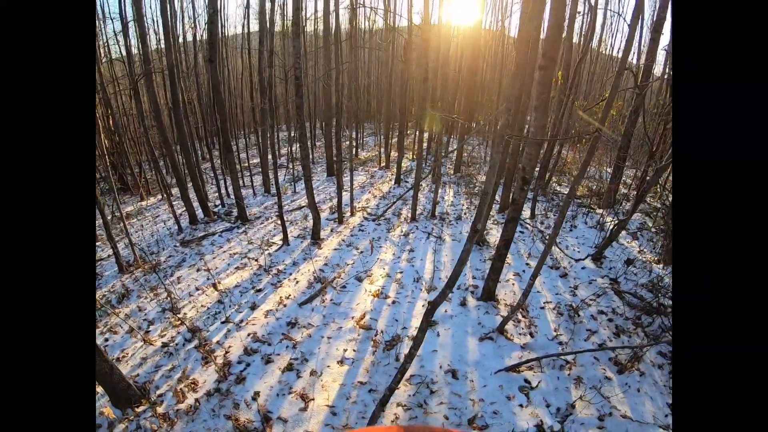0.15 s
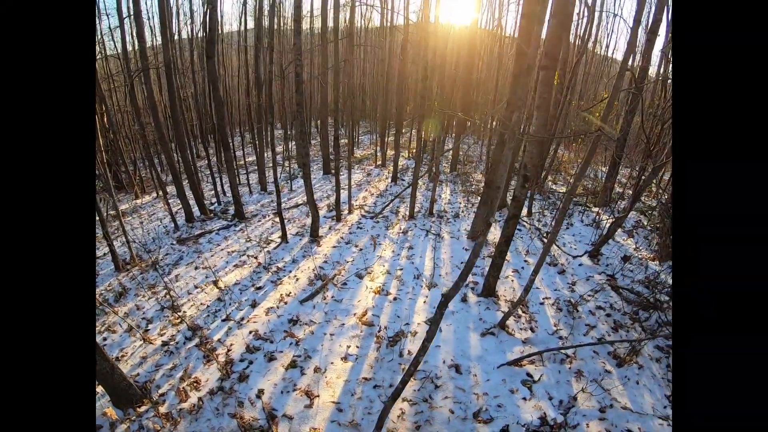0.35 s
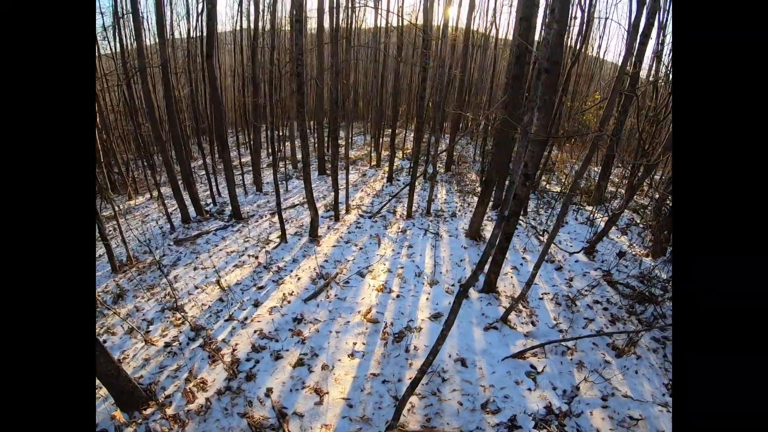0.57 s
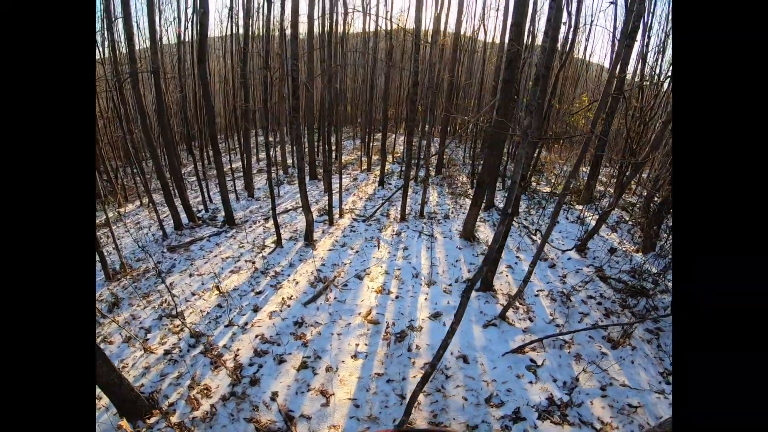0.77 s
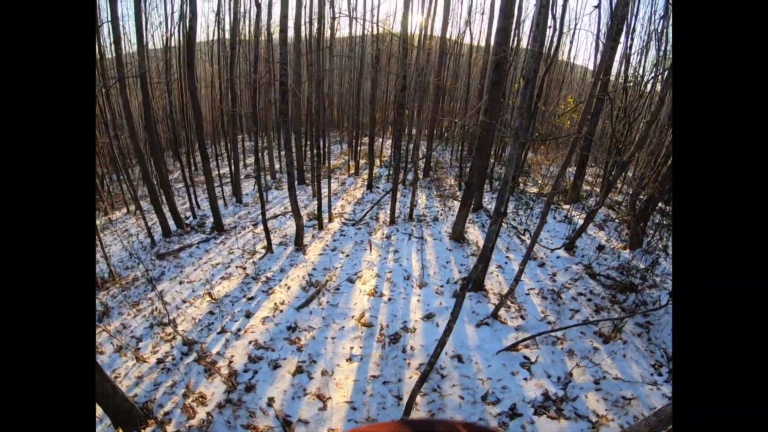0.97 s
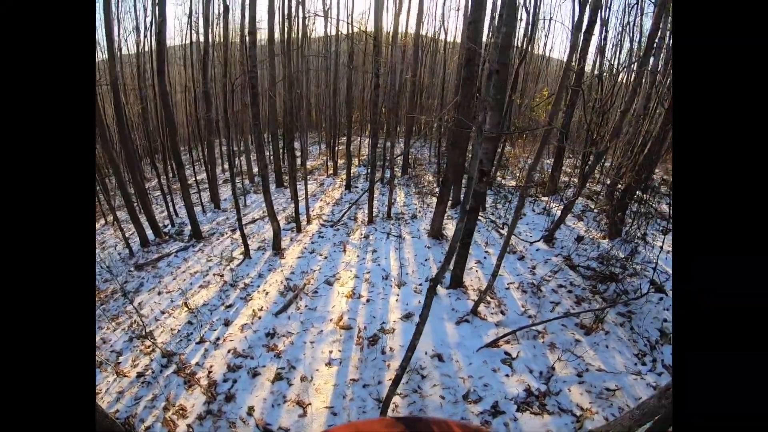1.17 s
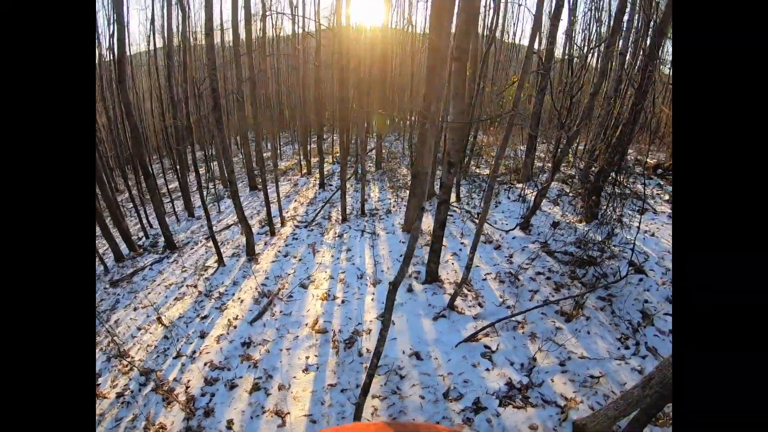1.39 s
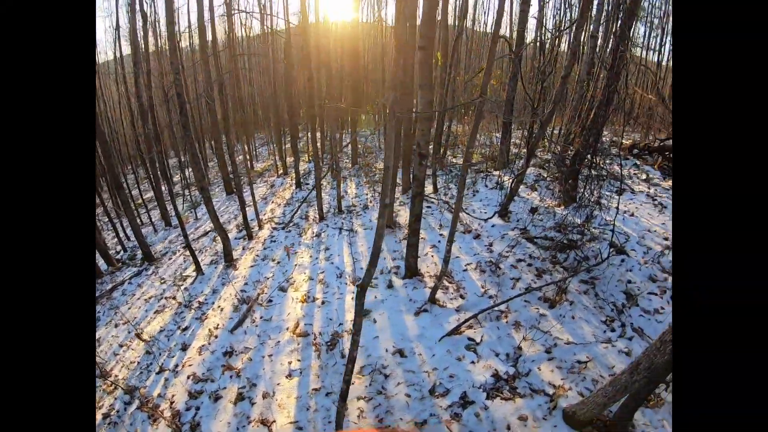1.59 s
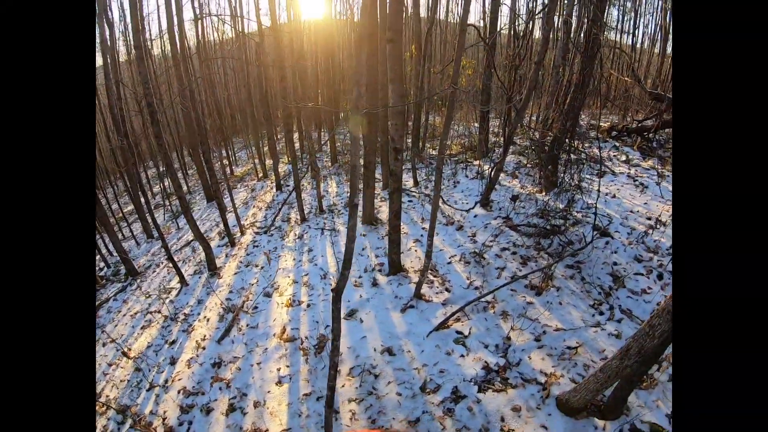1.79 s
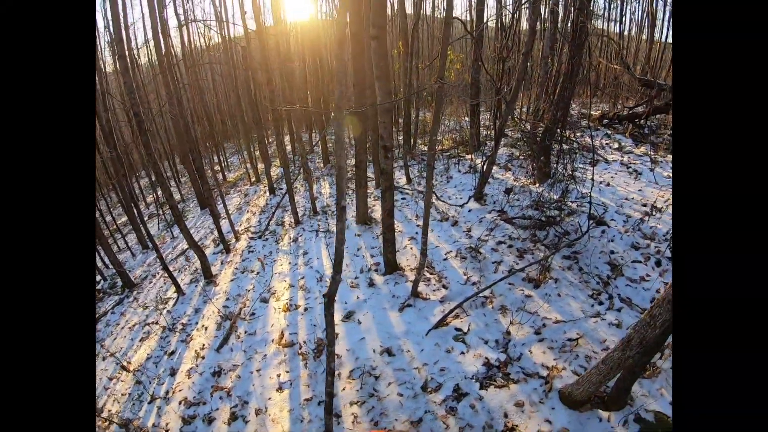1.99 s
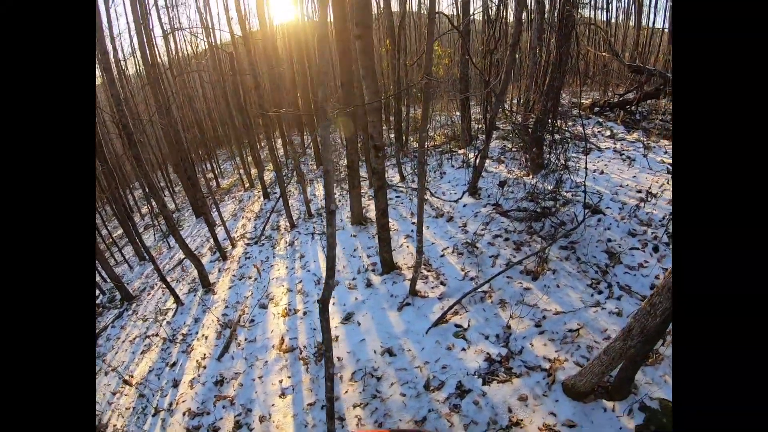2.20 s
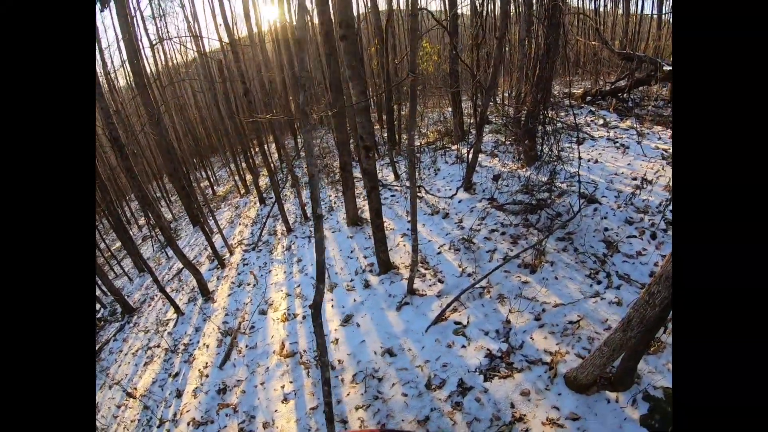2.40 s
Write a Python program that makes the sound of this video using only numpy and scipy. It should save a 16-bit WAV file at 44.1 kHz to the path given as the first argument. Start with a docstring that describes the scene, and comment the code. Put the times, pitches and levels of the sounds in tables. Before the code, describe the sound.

Boots press crisply into crusted snow over dead leaves, twigs snapping, then settle in a quiet wood

```python
"""Footsteps on snow and dry leaves

Two slow steps press through thin snow onto dry leaves in a still wood, then the walker shuffles to a halt.
Snow, leaves, ice and cloth are trains of random grains; crust and twigs are single breaks with splinters.
Decaying noise echoes scatter the steps; a faint low drone and a little wind are coloured noise."""
import sys
import numpy as np
from scipy import signal
from scipy.fft import rfft, irfft
from scipy.io import wavfile

SR = 44100
rng = np.random.default_rng(int(sys.argv[2]) if len(sys.argv) > 2 else 0)


def master(y):
    """Save y as 16-bit WAV."""
    cut = np.clip(np.atleast_2d(y).T, -1, 1)
    pcm = np.round(cut * 32767)  # scale
    wavfile.write(sys.argv[1], SR, pcm.astype(np.int16))


N = 108045
HZ = np.fft.rfftfreq(2048, 1 / SR)  # frequency grid for click spectra

# Foot pressure in the two steps, then the shuffle: time_s, snow_db (before SNOW_TRIM_DB), leaf_db, fizz_db
STEP_LEVELS = [(0, -85, -64, -71), (.08, -78, -62.5, -79), (.185, -87, -70, -80), (.24, -59, -48, -55.5),
               (.26, -44.5, -43.5, -54.5), (.28, -45, -48.5, -50), (.33, -47, -44, -48),
               (.40, -42.5, -38.5, -45), (.54, -40, -38.5, -43), (.63, -38.5, -39.5, -44.5),
               (.68, -42.5, -39.5, -48), (.755, -39, -41, -45.5), (.79, -40, -38, -47),
               (.815, -49, -44, -50), (.89, -48, -45.5, -54.5), (.925, -42, -47.5, -56.5),
               (.945, -40, -43.5, -42), (.985, -35.5, -38.5, -43.5), (1.05, -42, -39.5, -46),
               (1.13, -37.5, -38.5, -45.5), (1.205, -42, -38, -47.5), (1.23, -44.5, -45, -52),
               (1.30, -58, -53.5, -59.5), (1.375, -54.5, -56, -68), (1.44, -66, -64, -65)]
SHUFFLE_LEVELS = [(1.52, -68, -65, -70), (1.55, -57, -56.5, -60.5), (1.621, -65.5, -69, -71),
                  (1.72, -71, -72.5, -76), (1.78, -67, -67, -71), (1.83, -58.5, -57.5, -64),
                  (1.898, -53.5, -54.5, -55.5), (1.96, -64, -56.5, -68), (2.009, -74, -55.5, -55),
                  (2.05, -62, -60.5, -62.5), (2.12, -63, -53.5, -56.5), (2.169, -56, -53.5, -52.5),
                  (2.24, -83.5, -65, -75), (2.322, -68, -68.5, -72), (2.36, -71, -79, -63.5),
                  (2.45, -70.5, -89, -96)]
# Relative spectra of snow, leaf and ice grains: freq_hz, density_db_per_hz
SNOW_SPECTRUM = [(60, -57), (110, -31), (160, -17), (250, 0), (450, 2.5), (800, 0.5), (1200, -3),
                 (1800, -7), (4000, -33.5)]
LEAF_SPECTRUM = [(150, -59.5), (600, -7.5), (1200, -3), (1800, -5), (2500, -1.5), (3300, -3.5), (4300, -8),
                 (6000, -17), (12000, -44.5)]
FIZZ_SPECTRUM = [(1000, -34), (3500, -6.5), (5200, -2.5), (6500, -1), (8000, -1.5), (9500, -9.5),
                 (11000, -15), (13000, -24), (15000, -28)]
SNOW_TRIM_DB = -1.5
# Grain rate: nominal at BUSY_DB, doubling every RATE_DOUBLING_DB
BUSY_DB, RATE_DOUBLING_DB, GRAIN_RIPPLE_DB = -39.5, 7.5, 2

# Clothing rustle, relative spectrum: freq_hz, density_db_per_hz
CLOTH_SPECTRUM = [(250, -32), (450, -2), (800, -2), (1300, -1.5), (2000, -9.5), (4000, -21), (10000, -36.5)]
# Clothing rustle, level: time_s, level_db
CLOTH_LEVEL_DB = [(0, -67.5), (.08, -60), (.13, -61), (.22, -56.5), (.4, -62), (1.3, -61.5), (1.45, -67),
                  (1.7, -72), (2.45, -81)]

# Faint far drone, relative spectrum: freq_hz, density_db_per_hz
DRONE_SPECTRUM = [(30, -28), (90, -17.5), (120, -7), (145, -2), (195, 0.5), (230, 0), (270, -28),
                  (600, -19.5), (2000, -33), (8000, -34.5), (15000, -74)]
# Drone level: time_s, level_db
DRONE_LEVEL_DB = [(0, -62), (1.2, -60), (1.7, -62), (2, -58), (2.45, -59.5)]
# Light wind, relative spectrum: freq_hz, density_db_per_hz
WIND_SPECTRUM = [(10, 0), (35, 9.5), (55, 5), (90, -4.5), (130, -10), (300, -63)]
# Wind level before the side gain: time_s, level_db
WIND_LEVEL_DB = [(0, -71), (.6, -64.5), (.83, -87), (1.05, -66), (1.6, -65), (2.3, -71), (2.4, -78.5)]
# Soft low bumps of air, before the side gain: centre_s, level_db
AIR_PUFFS = [(.19, -72), (.47, -60), (.58, -79), (1.17, -65), (1.33, -58), (1.44, -56), (1.509, -63),
             (1.76, -53), (1.95, -73), (2.1, -74), (2.31, -77)]
WIND_LEFT_GAIN_DB, PUFF_SIGMA_S = -1.5, 0.0088  # right channel gets the opposite gain

# Leaves and twigs snapping: start_s, level_db, bass_db, treble_db, twig_ring_db, splinter_decay_s
SNAP_EVENTS = [(.028, -47, 1, -13, 5, .001), (.083, -32.5, 2, -1, 0, 0.0055),
               (0.146, -29, 10, 9, -3, 0.011), (.199, -25.5, 2, 2, -6, 0.0037),
               (.255, -16, -7, 7, -13, .006), (0.518, -14, 3, -3, -5, 0.0033),
               (.647, -10, -1, 6, 5.5, 0.0024), (.839, -12.5, 0.5, -6, -7, 0.0016),
               (1.182, -15, 9, 5, -4, 0.0044), (1.195, -15.5, -6, -12, 3, .004),
               (1.303, -20.5, -9, 4, -1, 0.0026), (1.313, -26, -24, -11, 20, 0.0013),
               (1.351, -24, 4, -19, -1, .0008), (1.372, -28, 16, -3, -8, 0.0023),
               (1.495, -31, 9.5, 14, 2.5, 0.0015), (1.529, -18.5, 2, -3, -13, 0.01),
               (1.548, -20, 2, -19, -2, 0.0069), (1.749, -32.5, -29, -20, 4, .001),
               (1.768, -33.5, 1, 2, -4, 0.0018), (1.790, -25, 17, 17, 8, 0.01),
               (1.819, -23, -3, 8, 0, 0.0011), (1.8232, -22, 14.5, 6, -6, 0.00074),
               (1.874, -20, -8, 3, 2, .002), (1.888, -10.5, 5.5, 6.5, -1.5, 0.0049),
               (1.9823, -17.5, 10, 4, 1, 0.0061), (2, -19, -5, 12, -1, 0.0056),
               (2.005, -16.5, -4.5, 0, -1, 0.0054), (2.080, -12.5, 3, 24, 13, 0.00075),
               (2.1364, -5.5, -3.5, -3.5, -3.5, 0.0078), (2.182, -18.5, -6, -37, 2, 0.0008),
               (2.23, -29, -17, 1, -12, .001), (2.265, -30.5, 0, 0, -6, 0.0013),
               (2.337, -23, -12.5, 1, -13, 0.0071)]
# Snap base spectrum, relative: freq_hz, density_db_per_hz
SNAP_SPECTRUM = [(70, -53.5), (160, 0), (400, 2), (900, 7), (1400, 6), (2400, 3.5), (3300, 9.5),
                 (4400, -3.5), (6200, -3), (8500, -13), (11000, -22), (15000, -33)]
TWIG_HZ, TWIG_HALF_WIDTH_HZ = 3230, 610
# TEAR_DECAY_S: burst decay before whitening; SPLINTER_SIZE: relative to the first break
TEAR_DECAY_S, SPLINTERS_PER_S, SPLINTER_SIZE = 0.00026, 3200, 0.65

# Lumps of crust giving way: start_s, level_db, pitch_hz, crumble_decay_s
CRUST_EVENTS = [(0.2236, -25.5, 620, 0.0063), (0.2515, -10.5, 650, 0.00092), (.262, -27, 820, 0.0049),
                (.286, -11, 860, 0.018), (0.376, -11, 600, 0.009), (.478, -21.5, 420, .005),
                (.579, -17, 650, 0.0019), (.598, -9.5, 710, 0.01), (0.629, -20, 560, .002),
                (0.646, -8, 735, 0.0038), (.723, -18, 750, 0.00089), (0.744, -11.5, 740, 0.0028),
                (0.758, -11.5, 537, 0.0066), (.798, -16, 534, 0.0017), (.940, -10, 515, 0.0065),
                (.970, -12, 524, 0.007), (.989, -8, 426, 0.0025), (1.034, -11, 550, .004),
                (1.078, -10, 500, 0.0037), (1.082, -13.5, 400, .004), (1.133, -9.5, 625, 0.012),
                (1.212, -16.5, 840, 0.003), (1.379, -26.5, 1100, .001), (1.538, -24, 880, 0.0018),
                (1.604, -26.5, 930, 0.00091)]

# Full weight on the snow: start_s, length_s, level_db
PRESS_EVENTS = [(0.355, 0.3, -50.5), (0.734, 0.058, -54.5), (0.961, .21, -44.5)]
# Packing snow, relative spectrum: freq_hz, density_db_per_hz
PACKING_SPECTRUM = [(60, -53), (110, -21), (150, -3), (220, 0), (330, -1), (450, 3), (700, -13.5),
                    (2000, -50)]
PRESS_RISE_S, PRESS_DECAY_S = 0.0124, 0.048

# Microphone pair, direct sound: freq_hz, left_minus_right_db
PAIR_BALANCE = [(200, 0.5), (400, 2.6), (750, -2), (1300, -3), (2400, 0), (4400, 1.5), (8300, -4.5),
                (10200, 26.5), (12000, 18)]
# Microphone pair, direct sound: freq_hz, left_lead_rad
PAIR_LEAD = [(250, 0), (780, -.3), (1500, .2), (2300, 0), (4300, .1), (6000, -1.2), (8000, -2.6),
             (10000, 0)]
# Near scatter relative to direct: freq_hz, scatter_db
SCATTER_RATIO = [(100, -30), (200, -45), (350, -12), (800, -4), (1500, -2), (3400, -4), (5000, -2.5),
                 (7000, 1.5), (14000, 12)]
# Colour of the wood's echo, before WOOD_DB: freq_hz, gain_db
WOOD_GAIN = [(150, -14), (400, -18), (900, -2.5), (4000, -5), (12000, 5)]
# Side of the feet: time_s, left_minus_right_db
FOOT_BALANCE = [(.2, -3), (.45, -1.2), (.8, -2.5), (1.1, -2.4), (1.55, -3.5), (1.9, -3.5), (2.3, -1.5)]
SCATTER_T60_S, WOOD_T60_S, WOOD_DB = 0.07, 0.87, -13
EDGE_HZ = 14500


def amp(db):
    """Decibels to gain."""
    return 10 ** (np.asarray(db) / 20)


def unit(x):
    """Scale to rms 1."""
    return x / np.sqrt(np.mean(x ** 2) + 1e-20)


def read(points, hz):
    """Interpolate a spectrum on a log-frequency axis."""
    f, value = np.transpose(points)
    return np.interp(np.log(hz + 1), np.log(f + 1), value)


def curve(rows, column=1):
    """Interpolate one column of a time table at every sample."""
    rows = np.array(rows)
    return np.interp(np.arange(N) / SR, rows[:, 0], rows[:, column])


def add(mix, start_s, sound):
    """Mix a sound in at a time."""
    part = mix[max(round(start_s * SR), 0):][:len(sound)]
    part += sound[:len(part)]


def click(spectrum_db, ripple_db, count=70):
    """Minimum-phase click of energy 1: the given spectrum plus random resonances."""
    ripple_points = np.c_[np.linspace(10, 127, count) ** 2, rng.standard_normal(count)]
    spectrum_db = spectrum_db + ripple_db * read(ripple_points, HZ)
    # fold the cepstrum to make the click causal
    cepstrum = irfft(np.log(amp(spectrum_db)))
    cepstrum[1:len(HZ) - 1] *= 2
    cepstrum[len(HZ):] = 0
    wave = irfft(np.exp(rfft(cepstrum)))
    return wave / np.linalg.norm(wave)


def grains(level_db, spectrum, per_s, spread_db, kinds=40):
    """Tiny impulses of random size and colour, denser and louder as the level rises."""
    rate_per_s = per_s * 2 ** ((level_db - BUSY_DB) / RATE_DOUBLING_DB)
    chance = np.minimum(rate_per_s / SR, 1)
    size = unit(amp(spread_db * np.minimum(rng.exponential(1, N), 3.5)))
    hits = rng.choice([-1, 1], N) * (rng.random(N) < chance)
    train = size * hits / np.sqrt(chance) * amp(level_db)  # level independent of rate
    kind = rng.integers(0, kinds, N)
    out = np.zeros(N)
    for k in range(kinds):
        grain = click(read(spectrum, HZ), GRAIN_RIPPLE_DB)
        out += signal.oaconvolve(train * (kind == k), grain)[:N]
    return out


def fracture(spectrum_db, decay_s, ripple_db, size=4096, runs=4):
    """One short tear and a dying run of splinters; energy 1."""
    t = np.arange(size) / SR
    tear = rfft(rng.standard_normal(size) * np.exp(-t / TEAR_DECAY_S))
    white_tear = irfft(tear / abs(tear))
    out = signal.fftconvolve(white_tear, click(spectrum_db, ripple_db))[:size]
    out *= t < t[-1] / 2  # drop the wrapped-around half
    for _ in range(runs):
        hits = rng.choice([-1, 1], size) * (rng.random(size) < SPLINTERS_PER_S / runs / SR)
        splinters = SPLINTER_SIZE * hits * np.exp(-t / decay_s)
        out += signal.fftconvolve(splinters, click(spectrum_db, ripple_db))[:size]
    return out / np.linalg.norm(out)


def noise(spectrum, alike):
    """Two channels of coloured noise sharing the power fraction alike."""
    shared, left, right = rng.standard_normal((3, N))
    pair = np.sqrt(alike) * shared + np.sqrt(1 - alike) * np.array([left, right])
    gain = amp(read(spectrum, np.fft.rfftfreq(N, 1 / SR)))
    return unit(irfft(rfft(pair) * gain, N))


def underfoot():
    """Snow crunches, leaves crackle and ice crystals fizz as the boot bears down."""
    rows = list(STEP_LEVELS) + list(SHUFFLE_LEVELS)
    snow = grains(curve(rows, 1) + SNOW_TRIM_DB, SNOW_SPECTRUM, per_s=630, spread_db=2.5)
    leaves = grains(curve(rows, 2), LEAF_SPECTRUM, per_s=2000, spread_db=2.5)
    fizz = grains(curve(rows, 3), FIZZ_SPECTRUM, per_s=28000, spread_db=4)
    return snow + leaves + fizz


def clothing():
    """Soft rustle of dense grains as the leg swings."""
    return grains(curve(CLOTH_LEVEL_DB), CLOTH_SPECTRUM, per_s=34000, spread_db=4.5, kinds=20)


def drone():
    """Faint low far drone: coloured noise, nearly alike in both channels."""
    return noise(DRONE_SPECTRUM, alike=0.92) * amp(curve(DRONE_LEVEL_DB))


def wind():
    """Light air on the microphone: low noise with a few soft puffs."""
    t = np.arange(N) / SR
    level = amp(curve(WIND_LEVEL_DB))
    for centre_s, level_db in AIR_PUFFS:
        level += amp(level_db) * np.exp(-.5 * ((t - centre_s) / PUFF_SIGMA_S) ** 2)
    side = amp(WIND_LEFT_GAIN_DB * np.array([[1], [-1]]))
    return noise(WIND_SPECTRUM, alike=.3) * level * side


def snaps(bass_corner_hz=1800, treble_corner_hz=4500):
    """Brittle leaves and twigs break; each fracture has its own bass, treble and twig-ring gain."""
    out = np.zeros(N)
    bass = 1 / (1 + (HZ / bass_corner_hz) ** 4)
    treble = 1 - 1 / (1 + (HZ / treble_corner_hz) ** 4)
    ring = 1 / (1 + ((HZ - TWIG_HZ) / TWIG_HALF_WIDTH_HZ) ** 2)
    for start_s, level_db, bass_db, treble_db, ring_db, decay_s in SNAP_EVENTS:
        tilt_db = bass_db * bass + treble_db * treble + ring_db * ring
        spectrum_db = read(SNAP_SPECTRUM, HZ) + tilt_db
        add(out, start_s, amp(level_db) * fracture(spectrum_db, decay_s, ripple_db=1.5))
    return out


def crust(width_octaves=0.62, snap_db=-24):
    """Dull pops as lumps of crust collapse: a spectral hump over a weak snap spectrum."""
    out = np.zeros(N)
    for start_s, level_db, pitch_hz, decay_s in CRUST_EVENTS:
        hump = np.exp(-.5 * (np.log2((HZ + 1) / pitch_hz) / width_octaves) ** 2)
        spectrum_db = 20 * np.log10(hump + amp(snap_db + read(SNAP_SPECTRUM, HZ)))
        add(out, start_s, amp(level_db) * fracture(spectrum_db, decay_s, ripple_db=4))
    return out


def packing():
    """Under full weight the snow packs down in deep, dull slips."""
    t = np.arange(N) / SR
    weight = np.zeros(N)
    for start_s, length_s, level_db in PRESS_EVENTS:
        rise = np.clip((t - start_s) / PRESS_RISE_S, 0, 1)
        fall = np.exp(-np.maximum(t - start_s - length_s, 0) / PRESS_DECAY_S)
        weight += amp(level_db) * rise * fall
    weight_db = 20 * np.log10(weight + 1e-6)
    return grains(weight_db, PACKING_SPECTRUM, per_s=1300, spread_db=1.0, kinds=12)


def echoes(x, t60_s, build_s, size=2048):
    """Dying noise reflections, separate per ear; a fresh random tail every half block, crossfaded."""
    t = np.arange(0, t60_s, 1 / SR)[:SR // 2]  # tail at most 0.5 s
    envelope = amp(-60 * t / t60_s) * np.minimum(t / build_s, 1) ** 2
    window = np.sin(np.pi * np.arange(size) / size)
    out, padded = np.zeros((2, N + SR * 2)), np.pad(x, size)
    for at in range(0, N + size, size // 2):
        tail = rng.standard_normal((2, len(t))) * envelope
        tail /= np.linalg.norm(tail, axis=1, keepdims=True)
        piece = padded[at:at + size] * window
        wet = signal.fftconvolve(piece[None], tail, axes=1)
        out[:, at:at + wet.shape[1]] += wet
    return out[:, size:size + N]


def woodland(x):
    """Direct sound reaches two microphones; ground, body and trunks scatter the rest."""
    hz = np.fft.rfftfreq(N, 1 / SR)
    half = amp(read(PAIR_BALANCE, hz) / 2) * np.exp(.5j * read(PAIR_LEAD, hz))
    direct = rfft(x) * np.array([half, 1 / half])
    scatter = amp(read(SCATTER_RATIO, hz))
    near = scatter * rfft(echoes(x, SCATTER_T60_S, build_s=0.0019))
    wood_gain = amp(WOOD_DB + read(WOOD_GAIN, hz))
    far = wood_gain * rfft(echoes(x, WOOD_T60_S, build_s=0.053, size=16384))
    return irfft((direct + near) / np.sqrt(1 + scatter ** 2) + far, N)


def scene():
    """Footsteps, a little to the right, over the quiet of the wood."""
    steps = underfoot() + clothing() + snaps() + crust() + packing()
    side = amp(curve(FOOT_BALANCE) * np.array([[.5], [-.5]]))
    return woodland(steps) * side + drone() + wind()


def record(dry):
    """Linear-phase low-pass at the band limit."""
    lowpass = signal.firwin(255, EDGE_HZ, window=("kaiser", 9), fs=SR)
    return signal.oaconvolve(dry, lowpass[None], "same")


dry = scene()
out = record(dry)
master(out)
```